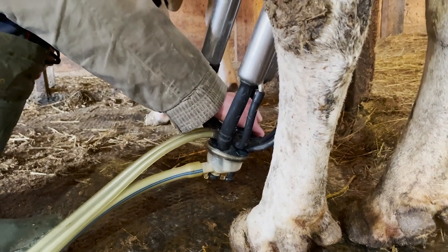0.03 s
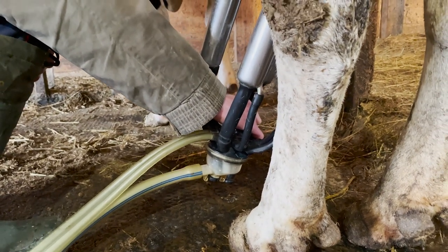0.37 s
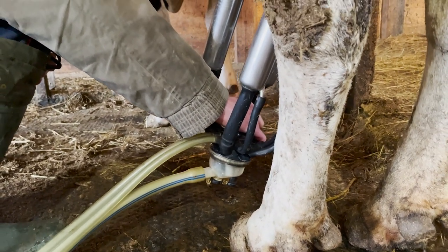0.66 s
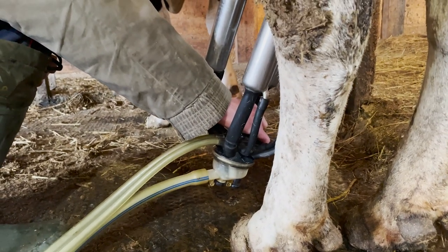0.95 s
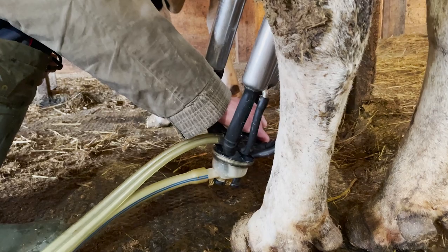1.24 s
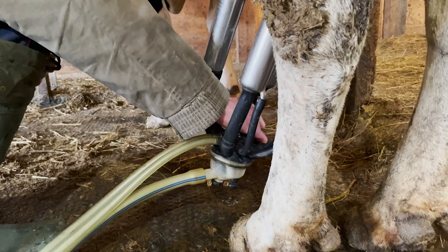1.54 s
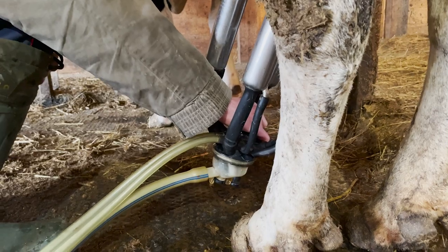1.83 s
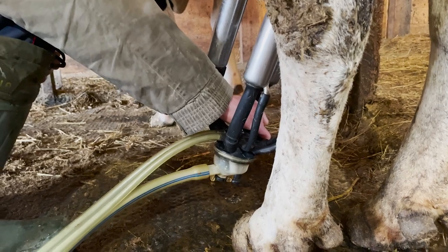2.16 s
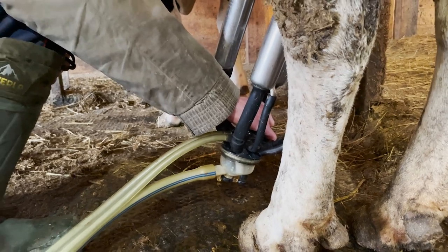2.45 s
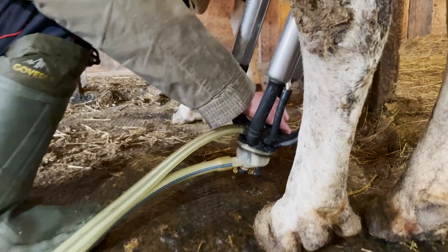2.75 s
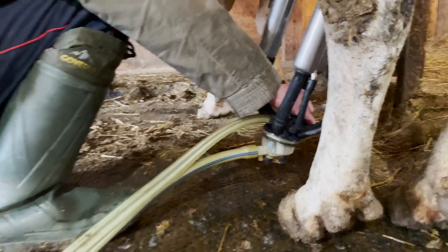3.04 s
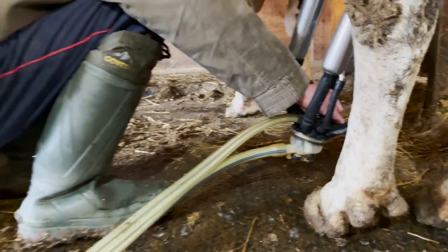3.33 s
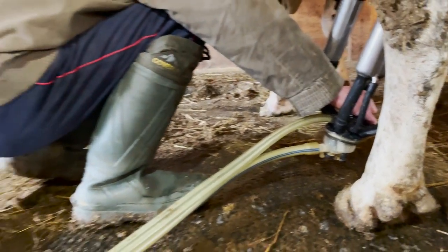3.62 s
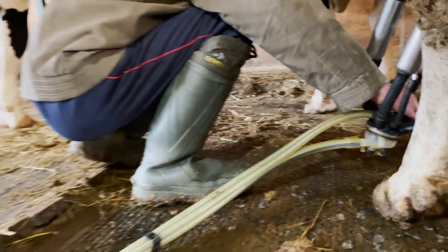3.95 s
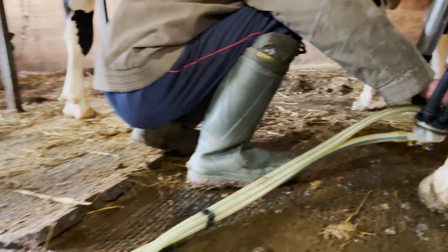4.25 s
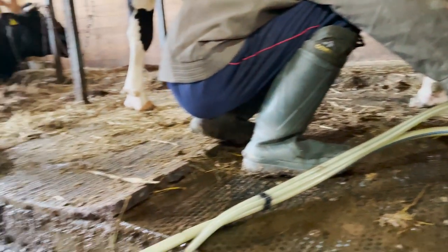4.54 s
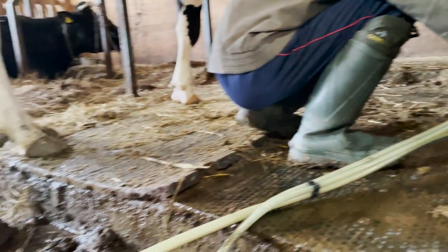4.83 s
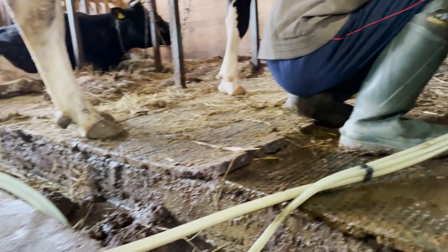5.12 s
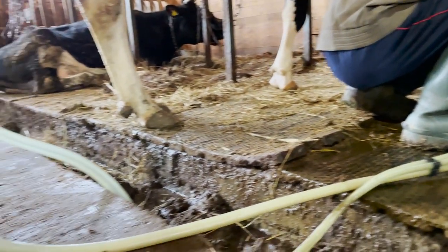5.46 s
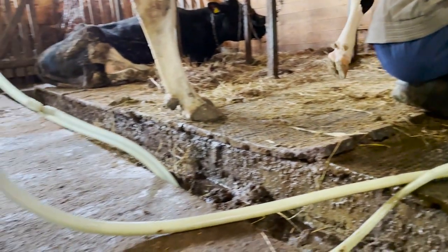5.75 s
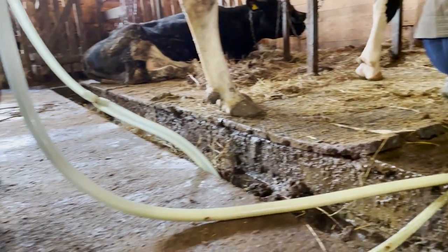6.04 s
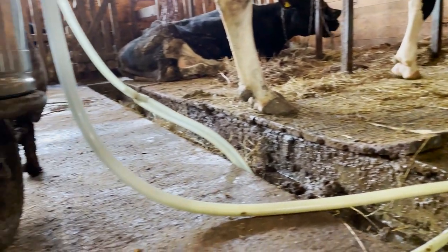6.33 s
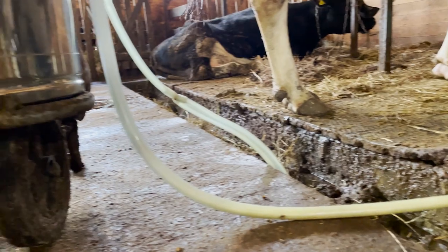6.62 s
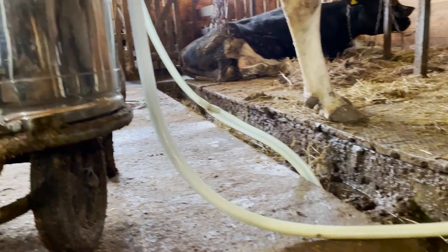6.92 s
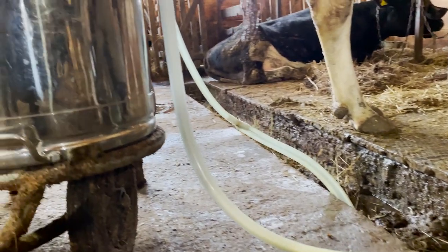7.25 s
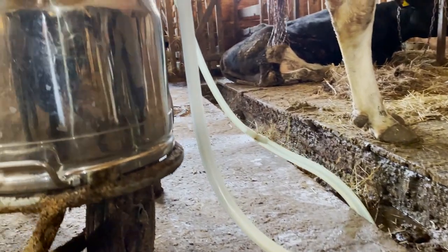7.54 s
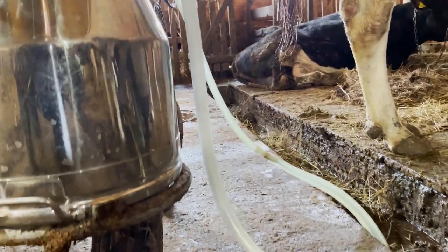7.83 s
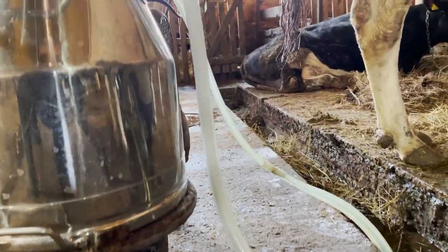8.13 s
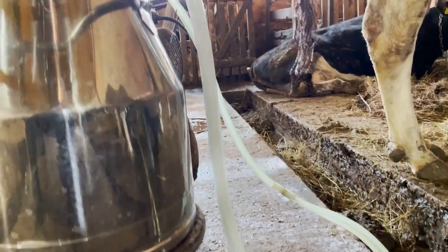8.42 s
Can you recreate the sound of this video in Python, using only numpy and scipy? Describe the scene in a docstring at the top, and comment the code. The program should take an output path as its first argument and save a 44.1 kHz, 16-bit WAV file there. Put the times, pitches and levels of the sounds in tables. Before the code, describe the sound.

A milking machine runs in a cow barn. Its vacuum pump gives a steady low hum with a wavering whine and a fast rattle, while the pulsator puffs air about once a second. Two faint high squeaks come early, then a few soft hoof thuds. As the microphone moves from the teat cups towards the pump, the sound grows louder and brighter. Past the middle, a sharp click is followed by a dull hoof knock.

```python
"""Bucket milker in a cow barn

A four-vane vacuum pump hums, whines, rattles on every turn and beats against its motor's mains hum.
The pulsator puffs about once a second over a sharp click, soft hoof thuds, two squeaks and a far drone.
The microphone moves from the cluster towards the trolley; standing waves make tones dip and swell."""
import sys
import numpy as np
from scipy import signal
from scipy.fft import irfft, next_fast_len
from scipy.io import wavfile
from scipy.ndimage import uniform_filter1d, map_coordinates

SR = 44100
rng = np.random.default_rng(int(sys.argv[2]) if len(sys.argv) > 2 else 0)


def output_pcm(signal):
    """Save a mono or channel-first signal as 16-bit PCM at the path in sys.argv[1].

    Samples are clipped to [-1, 1] before scaling.
    """
    pcm = np.clip(np.atleast_2d(signal).T, -1, 1) * 32767
    wavfile.write(sys.argv[1], SR, np.round(pcm).astype(np.int16))


N = 378378
TIME = np.arange(N) / SR
FFT_SIZE = next_fast_len(N)
BINS_HZ = np.maximum(np.arange(FFT_SIZE // 2 + 1) * SR / FFT_SIZE, 1)
SHAFT_HZ, VANES, MAINS_HZ = 24.508, 4, 50.008
CUTOFF_HZ = 15500

# the move towards the trolley: t/s, nearness to the pump (0 far, about 1 close)
NEARNESS = [(0, 0.03), (3, 0.01), (3.7, 0.16), (4.5, 0.39), (5.5, 0.68), (8, 1.14), (8.58, 1.15)]
# tone colour gained at nearness 1: f/Hz, gain/dB
NEAR_EQ = [(60, 0.5), (130, -1.5), (250, 5.5), (450, 2), (700, 3.5), (1100, 0.5), (1600, 5), (3500, -1.4),
           (5500, 7), (8000, 4.5), (14000, 5.5)]
# standing-wave nodes on the way: t/s, shaft order, half width/s, depth/dB
NODE_CROSSINGS = [(.55, 96, 0.28, 8), (.9, 90, .3, 19), (2.02, 90, 0.32, 19), (2.9, 88, 0.45, 22),
                  (3.05, 90, .35, 15), (3.3, 217, 1, 14), (3.63, 96, 0.2, 17), (3.73, 8, 0.8, 15),
                  (3.8, 24, 0.6, 4), (4.1, 48, 0.3, 14), (4.12, 88, 0.21, 26), (4.5, 96, .28, 16),
                  (4.75, 12, 0.57, 9), (5.45, 88, 1.1, 10), (6.15, 24, 1.07, 6), (6.3, 48, 0.69, 15),
                  (6.37, 88, 0.26, 22), (6.5, 96, 0.17, 18), (7.25, 236, .4, 8), (7.6, 88, 0.24, 22),
                  (7.68, 96, 0.2, 20), (8.58, 12, 1.35, 11), (9.6, 8, 1, 17)]
# stereo image of the noise: f/Hz, left-right likeness (-1 to 1)
STEREO_LIKENESS = [(60, 0.96), (300, 0.89), (520, 0.45), (660, -0.024), (900, -0.2), (1700, -0.14),
                   (2400, 0.27), (4500, 0.49), (6000, 0.31), (7500, 1), (15000, 1)]
# the treble turns out of phase between left and right: f/Hz, right lead/rad
TREBLE_LEAD = [(4500, -.4), (5800, 0), (7000, 1.4), (8100, 3.1), (8800, 3.7), (9700, 4.7), (11000, 6.1),
               (12300, 6.6), (13200, 7.7), (14500, 9.3)]
# swells of the far drone: t/s, length/s, starting f/Hz, climb/(Hz per s), level/dB
DRONE_SWELLS = [(0, 2.3, 43.9, 12.2, -49), (3.3, 1.0, 51.5, 1.5, -50), (5.205, 3.6, 47.8, 3.0, -47)]
# hooves and boots on the bedding; the last row is the barn's ring after the hoof knock: t/s, level/dB, f/Hz,
# decay/s
BEDDING_THUDS = [(2.33, -41, 75, .08), (2.36, -42, 168, 0.12), (3.3, -43, 200, 0.096),
                 (3.42, -42, 170, 0.15), (3.74, -40, 420, 0.087), (3.8, -43, 560, .06),
                 (5.819, -32, 189, 0.089)]
# air squeaking past a teat cup: t/s, level/dB, f/Hz, decay/s
CUP_SQUEAKS = [(.526, -50, 9950, 0.075), (.698, -43.5, 9930, 0.045)]
# barn echoes of the click: f/Hz, level/(dB per Hz)
CLICK_ECHOES = [(400, -95), (900, -68), (2200, -69), (4000, -75), (7000, -92), (14000, -110)]
# pulsator hiss: f/Hz, base level/(dB per Hz)
PUFF_SPECTRUM = [(900, -100), (1700, -76), (2600, -78), (3800, -75), (4600, -79), (6000, -94), (9000, -93),
                 (14000, -110)]
# pump housing and pipe resonances: f/Hz, width/Hz, gain/dB
BODY_RESONANCES = [(458, 100, 4), (686, 160, 4.5), (1198, 276, 6), (1655, 320, 8), (2276, 260, 6.5),
                   (3480, 920, 5), (5470, 1020, 4), (8500, 910, 5.5)]
# rushing air and barn rumble: f/Hz, base level/(dB per Hz)
RUSH_SPECTRUM = [(22, -89), (38, -84), (55, -65.5), (80, -63), (125, -71), (250, -77.5), (400, -81.5),
                 (900, -84), (1400, -87.5), (2700, -90.5), (5000, -94), (7500, -94.5), (11000, -97.5),
                 (15000, -100)]
# exhaust pipe resonances: f/Hz, width/Hz, aisle level/dB, nearness gain/dB
PIPE_RESONANCES = [(476, 97, -48.5, -5), (680, 118, -57.5, 10)]
# vanes scraping round the housing: f/Hz, base level/(dB per Hz)
SCRAPE_SPECTRUM = [(45, -84), (73, -62.5), (130, -77.5), (400, -86.5), (900, -82.5), (1180, -80.5),
                   (1600, -90), (2220, -88), (2900, -93.5), (4400, -94), (5400, -92.5), (8400, -91.5),
                   (10000, -99), (15000, -103)]
# what sets the housing ringing: multiples of the shaft rate
RINGING_ORDERS = (44, 48, 51, 67, 88, 90, 96, 168, 217, 236)
# one row per ringing order: stall level/dB, aisle level/dB, nearness gain/dB, swell/dB, flutter/dB
RINGING_LEVELS = [(-62, -62, -3, 3.5, 4.5), (-66, -52, -2, 1, 4), (-57, -73.5, 13.5, 3, 2.5),
                  (-67.5, -59, -1, 2.5, 4), (-52.5, -43, -4, 1.5, 1.5), (-53, -62, 2, 3, 2),
                  (-51, -48.5, -1.5, 0.5, 2.5), (-66, -69, 3, 2.5, 4), (-61.5, -66, 2, 1.2, 3),
                  (-67, -79, 23, -0.5, 2)]
# motor hum: multiple of the mains, base level/dB
MAINS_HARMONICS = [(2, -43), (3, -60.5), (4, -54.5), (6, -56.5), (9, -67), (10, -57.5), (12, -58.5),
                   (14, -78), (16, -68.5)]
# vane harmonics 1 to 6: stall level/dB, aisle level/dB, nearness gain/dB, left-right balance/dB,
# left lead in the stall/rad, left lead near the pump/rad
VANE_HARMONICS = [(-23.5, -21.5, 2, -0.9, 0.52, 0.095), (-29, -28.5, 10, -1.3, 0.23, 0.088),
                  (-42.5, -43, 5.5, 1.5, .35, .65), (-64.5, -46, 2.5, 3, 1.3, .65),
                  (-51, -47, 5.5, -1, .4, .65), (-43, -34.5, -8.5, 1.5, 1.9, 1.6)]
# extra pan of the second vane harmonic: t/s, left-right balance/dB
SECOND_HARMONIC_PAN = [(3.4, -1), (4.4, 6.5), (5.3, 5.5), (8.58, 1.5)]


def from_db(db):
    """Decibels to gain."""
    return 10 ** (np.asarray(db) / 20)


def in_time(points):
    """An automation curve read at every sample."""
    return np.interp(TIME, *np.transpose(points))


def at_hz(points, hz):
    """A spectrum read on a log-frequency axis."""
    f, value = np.transpose(points)
    return np.interp(np.log(hz), np.log(f), value)


def drift(rate_hz):
    """A smooth random wobble with a spread of about 1."""
    knots = rng.standard_normal(int(rate_hz * TIME[-1]) + 4)
    coarse = TIME[::100]
    return np.interp(TIME, coarse, map_coordinates(knots, [coarse * rate_hz + 1], order=3))


def burst(start, rise, decay):
    """An envelope with a smooth attack and an exponential fall."""
    age = np.maximum(TIME - start, 0)
    return (1 - np.exp(-np.minimum(age / rise, 6) ** 2)) * np.exp(-np.minimum(age / decay, 20))


def band_pass(sound, low_hz, high_hz, order=2):
    """Keep one band of a sound."""
    return signal.sosfilt(signal.butter(order, [low_hz, high_hz], "band", fs=SR, output="sos"), sound)


def stereo_lines(hz):
    """Random spectral lines of unit power, as the two microphones pick them up."""
    mid, side = (rng.standard_normal((2, len(hz))) + 1j * rng.standard_normal((2, len(hz)))) / 2
    alike = np.clip(at_hz(STEREO_LIKENESS, hz), -1, 1)
    mid, side = np.sqrt(1 + alike) * mid, np.sqrt(1 - alike) * side
    return np.array([mid + side, (mid - side) * np.exp(1j * at_hz(TREBLE_LEAD, hz))])


def to_sound(lines):
    """Stereo noise from line strengths per root Hz."""
    return irfft(lines * np.sqrt(SR * FFT_SIZE / 2), FFT_SIZE)[:, :N]


def noise(spectrum=((20, 0), (20000, 0)), eq_db=0):
    """Stereo noise with a spectrum in dB per Hz, white by default."""
    return to_sound(stereo_lines(BINS_HZ) * from_db(at_hz(spectrum, BINS_HZ) + eq_db))


def tone(cycles, level_db, pan_db=0, lead=0):
    """A sine at an rms level, panned at constant power; the left ear leads by `lead` radians."""
    ear = np.array([[.5], [-.5]])
    peak = np.sqrt(2) * from_db(level_db + ear * pan_db) / np.sqrt(np.cosh(pan_db * np.log(10) / 20))
    return peak * np.cos(2 * np.pi * cycles + ear * lead)


def body_db(hz):
    """The lift from the housing and pipe resonances."""
    return sum(db / (1 + (2 * (hz - f) / width) ** 4) for f, width, db in BODY_RESONANCES)


def in_aisle(leave_s=2.9, takes_s=1.1):
    """0 while the microphone is in the stall, 1 once it has swung out into the aisle."""
    return np.clip((TIME - leave_s) / takes_s, 0, 1)


def shaft_tone(order, turns, level_db, pan_db, lead, offset):
    """A multiple of the shaft rate in its standing wave: it dips and flips phase at each node."""
    ear_shift = 0.17 * np.array([[1], [-1]])   # in half widths of a node; the left crosses first
    wave = np.ones((2, 1))
    for s, node_order, half_width, depth_db in NODE_CROSSINGS:
        if round(node_order) == order:
            side = np.tanh((TIME - s) / half_width + ear_shift)
            wave = wave * (side - 1j * from_db(-depth_db) * np.sqrt(1 - side ** 2))
    return np.abs(wave) * tone(order * turns + offset + np.angle(wave) / (2 * np.pi), level_db, pan_db, lead)


def far_drone(waver_db=1.5, waver_hz=0.85, fade_s=0.28):
    """A faint low tone that comes and goes, climbing each time."""
    out = 0
    for s, length, hz, climb, db in DRONE_SWELLS:
        age = TIME - s
        fade = np.clip(np.minimum(age, length - age) / fade_s, 0, 1)
        cycles = np.cumsum(hz + climb * age + waver_hz * drift(10)) / SR
        out = out + fade * tone(cycles, db + waver_db * drift(3))
    return out


def noise_hits(rows, relative_width, rise_s):
    """Short bursts of noise, each in its own band."""
    out, white = 0, noise()
    for s, db, hz, decay in rows:
        grain = band_pass(white, hz / (1 + relative_width), hz * (1 + relative_width))
        out = out + from_db(db) * grain / grain.std() * burst(s, rise_s, decay)
    return out


def bedding_thuds():
    """Hooves and boots land softly on the bedding: broad, low bumps; the barn rings on after the hoof knock."""
    return noise_hits(BEDDING_THUDS, relative_width=0.37, rise_s=0.0046)


def cup_squeaks():
    """Air slips past a teat cup: thin, high whistles."""
    return noise_hits(CUP_SQUEAKS, relative_width=0.019, rise_s=0.0068)


def hoof_knock(at_s=5.818, level_db=-17, hz=190, decay_s=0.0068):
    """A hoof hits the stall floor: a dull knock that dies within a few cycles."""
    return from_db(level_db) * burst(at_s, 0.00054, decay_s) * np.sin(2 * np.pi * hz * (TIME - at_s))


def click(at_s=5.6781, peak_db=-12.5, tail_s=0.043):
    """A fitting snaps: one hard pressure pulse, a little to the left, and a spray of barn echoes."""
    impulse = (np.arange(N) == round(at_s * SR)) + 1e-18
    snap = band_pass(impulse, 1000, 3100)
    direct = from_db(peak_db) * snap / np.abs(snap).max() * from_db([[0], [-2.5]])
    return direct + noise(CLICK_ECHOES) * burst(at_s, .001, tail_s)


def pulsator(near, first_s=0.15, every_s=1.1045, hold_s=0.077, decay_s=.11, vent_hz=3950, width_hz=450):
    """The valve lets air into the pulse tubes: a ragged hiss rings in the vent and fades as they fill."""
    flow = sum(burst(s, rise=0.011, decay=np.inf) * np.exp(-np.clip(TIME - s - hold_s, 0, 2) / decay_s)
               for s in np.arange(first_s, TIME[-1], every_s))
    vent_db = 2.5 / (1 + (2 * (BINS_HZ - vent_hz) / width_hz) ** 2)
    hiss = noise(PUFF_SPECTRUM, vent_db)
    distance_db, ragged_db = -5.5 + 2 * near, 2 * drift(35)
    return hiss * flow * from_db(distance_db + ragged_db)


def air_rush(turns, near, vane_depth=0.15, shaft_depth=0.13):
    """A bed of exhaust air, throbbing with vanes and shaft, brighter near the pump."""
    lines = stereo_lines(BINS_HZ) * from_db(at_hz(RUSH_SPECTRUM, BINS_HZ) + body_db(BINS_HZ))
    far_air = to_sound(lines)
    close_air = to_sound(lines * from_db(at_hz(NEAR_EQ, BINS_HZ)))
    throb = 1 + vane_depth * np.cos(2 * np.pi * VANES * turns) + shaft_depth * np.cos(2 * np.pi * turns)
    return (far_air * (1 - near) + close_air * near) * throb


def exhaust_pipe(turns, near, throb=0.36, stall_shade_db=14.5):
    """Gulps of air excite the outlet pipe's two resonances, fainter from inside the stall."""
    gulps = noise() * (1 + throb * np.cos(2 * np.pi * VANES * turns))
    out, shade_db = 0, stall_shade_db * (1 - in_aisle())
    for hz, width, db, near_db in PIPE_RESONANCES:
        ring = band_pass(gulps, hz - width / 2, hz + width / 2)
        out = out + from_db(db + near_db * near - shade_db) * ring / ring.std()
    return out


def vane_rattle(turns, near, spots=26, size=4096):
    """The vanes scrape alike on every turn; the echo pattern morphs as the microphone moves."""
    hz = SHAFT_HZ * np.arange(1, int(CUTOFF_HZ / SHAFT_HZ))
    scrape = from_db(at_hz(SCRAPE_SPECTRUM, hz) + body_db(hz)) * np.sqrt(SHAFT_HZ / 2) * size
    lines = np.array([stereo_lines(hz) for _ in range(spots)]) * scrape   # one echo pattern per spot
    spots_per_s = 0.797 + 3.11 * np.clip(near, 0, .8)
    path = np.minimum(np.cumsum(spots_per_s) / SR, spots - 1.001)
    near_db = np.interp(np.arange(spots), path, near)[:, None, None] * at_hz(NEAR_EQ, hz)
    # near reflections lift and sink groups of neighbouring orders in the treble
    ridges = uniform_filter1d(rng.standard_normal((spots, 1, len(hz))), size=5) * np.sqrt(5)
    ridge_db = at_hz([(1500, 1), (5000, 4)], hz) * np.clip(ridges, -2, 2)
    lines = lines * from_db(near_db + ridge_db)
    # the shaft plays a one-turn loop, crossfaded from spot to spot
    loop_size = 4 * size
    loops = irfft(np.pad(lines, ((0, 0), (0, 0), (1, 0))), loop_size) * 4
    angle = (turns % 1 * loop_size).astype(int) % loop_size
    spot = path.astype(int)
    blend = (path - spot) * np.pi / 2
    return loops[spot, :, angle].T * np.cos(blend) + loops[spot + 1, :, angle].T * np.sin(blend)


def housing_whine(turns, near, neighbour_db=-63.0):
    """High shaft orders ring in the housing, swelling and fluttering; close neighbours beat."""
    def sing(order, db):
        pan_db = 5.5 * near + 2.5 * drift(2.02)
        lead = -.6 + 0.83 * drift(1.98)
        return shaft_tone(order, turns, db, pan_db, lead, offset=rng.random() + 0.043 * drift(2.06))
    aisle, ringing = in_aisle(), 0
    for order, (stall_db, aisle_db, near_db, swell_db, flutter_db) in zip(RINGING_ORDERS, RINGING_LEVELS):
        level_db = stall_db + (aisle_db - stall_db) * aisle + near_db * near
        ringing = ringing + sing(order, level_db + swell_db * drift(1.99) + flutter_db * drift(20))
    return ringing + sum(sing(order, neighbour_db + 1.5 * drift(2)) for order in (89, 92))


def motor_hum(near, in_step_s=.22):
    """Magnetic hum; its 100 Hz line beats twice a second with the vane tone."""
    (_, main_db), *upper = MAINS_HARMONICS
    cycles = 2 * MAINS_HZ * (TIME - in_step_s) + VANES * SHAFT_HZ * in_step_s
    buzz = sum(tone(round(k) * MAINS_HZ * TIME + rng.random(), db + 3.1 * near, lead=rng.normal(0, 1.0))
               for k, db in upper)
    return tone(cycles, main_db + 7.5 * near) + buzz


def vane_hum(turns, near, waver_db=0.0949, second_lag_cycles=0.866):
    """Each vane pushes out a gulp of air: a strong low tone whose upper harmonics waver more."""
    aisle, close, out = in_aisle(), np.minimum(near, 0.85), 0
    for k, (stall_db, aisle_db, near_db, pan_db, stall_lead, near_lead) in enumerate(VANE_HARMONICS, 1):
        level_db = stall_db + (aisle_db - stall_db) * aisle + near_db * close
        level_db += waver_db * (k - 1) * drift(10)
        if k == 2:
            pan_db = pan_db + in_time(SECOND_HARMONIC_PAN)
        lead = stall_lead + (near_lead - stall_lead) * close
        offset = {1: 0, 2: -second_lag_cycles}.get(k, rng.random())
        out = out + shaft_tone(k * VANES, turns, level_db, pan_db, lead, offset)
    return out


def scene():
    """Pump and pulsator up front, with the small barn sounds and the far drone behind."""
    near = in_time(NEARNESS)
    turns = SHAFT_HZ * TIME + 0.0011 * drift(2) + .0001 * drift(22)   # the shaft wanders under load
    pump_tones = vane_hum(turns, near) + motor_hum(near) + housing_whine(turns, near)
    pump_noise = vane_rattle(turns, near) + air_rush(turns, near) + exhaust_pipe(turns, near)
    barn = click() + hoof_knock() + bedding_thuds() + cup_squeaks()
    return pump_tones + pump_noise + pulsator(near) + barn + far_drone()


def record(dry, tilt=0.12):
    """The left microphone has a little more presence, the right a little less; the top is cut."""
    presence = band_pass(dry, 2200, 6000, order=1)
    top_cut = signal.cheby2(14, 70, CUTOFF_HZ, fs=SR, output="sos")
    return signal.sosfilt(top_cut, dry + tilt * presence * [[1], [-1]])


dry = scene()
out = record(dry)
output_pcm(out)
```